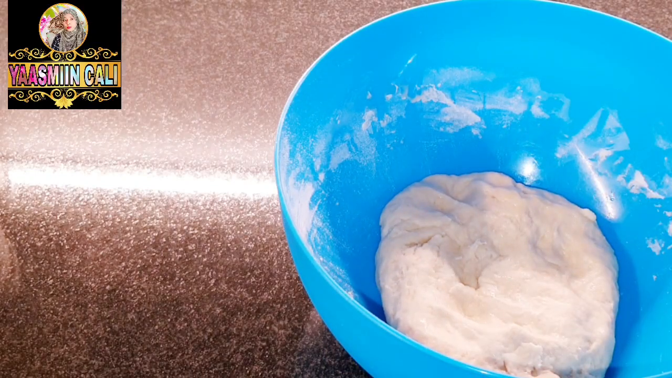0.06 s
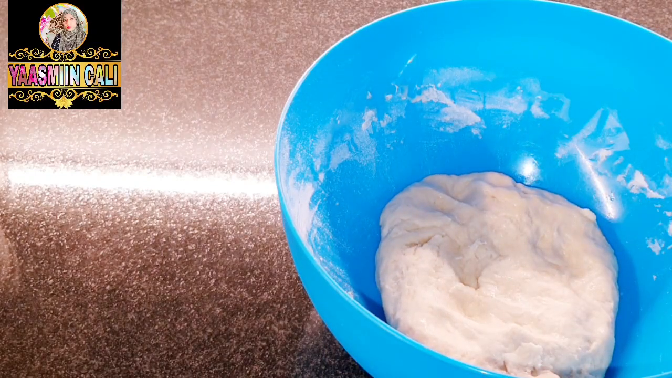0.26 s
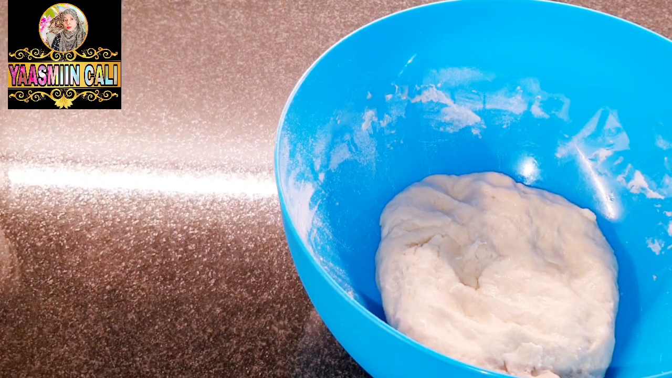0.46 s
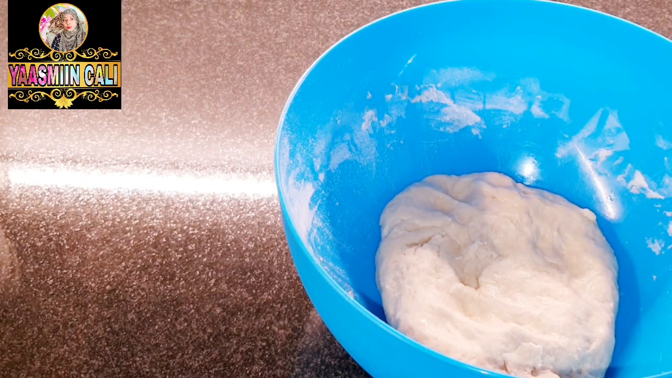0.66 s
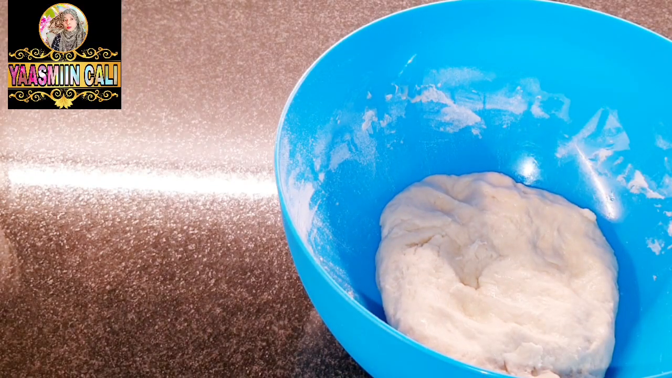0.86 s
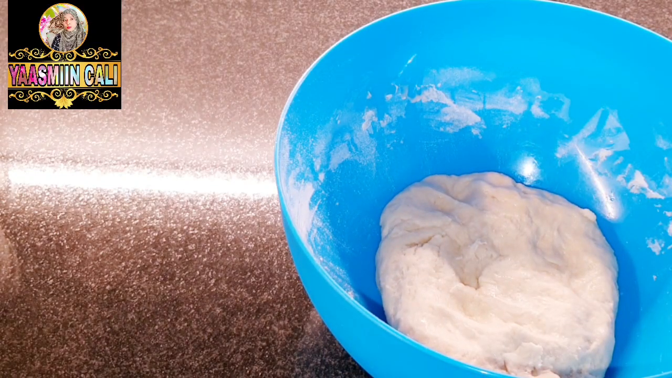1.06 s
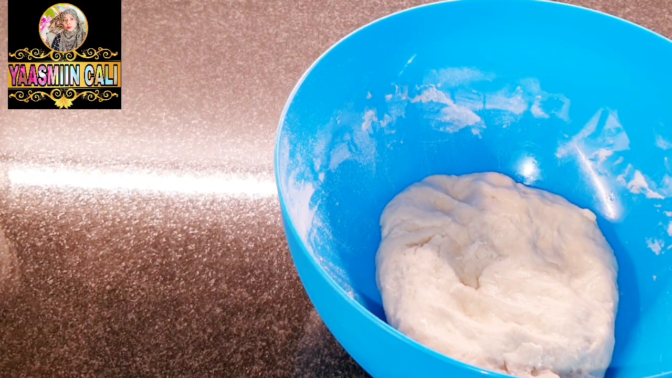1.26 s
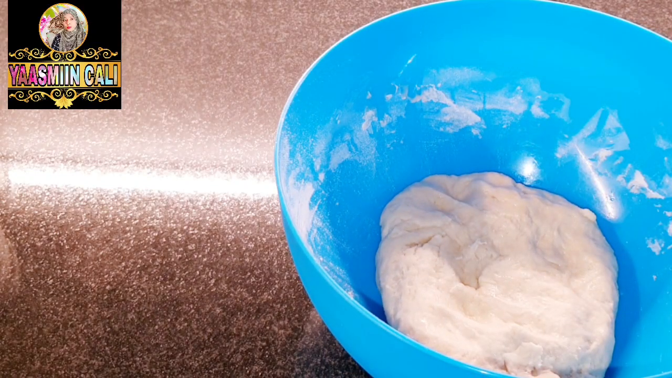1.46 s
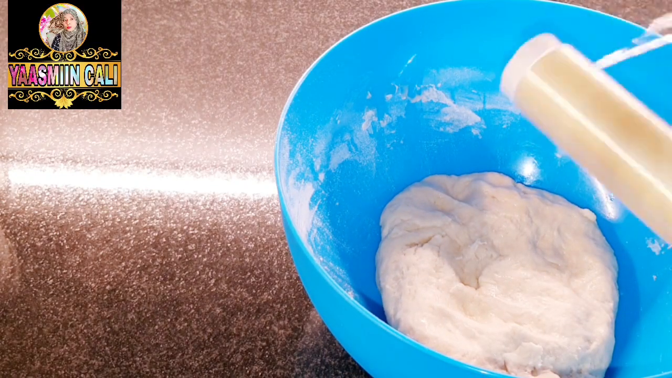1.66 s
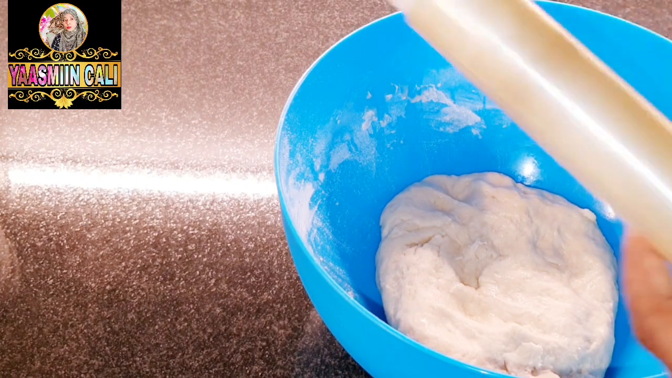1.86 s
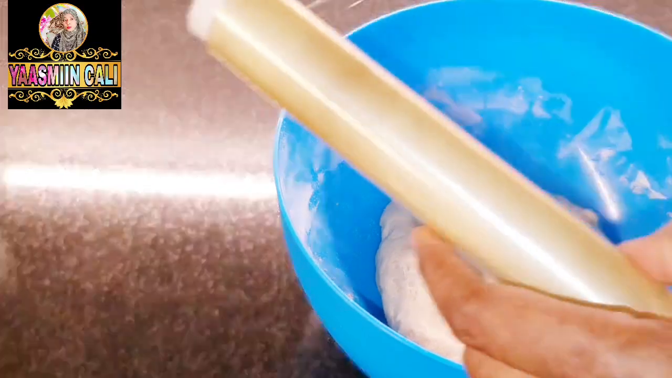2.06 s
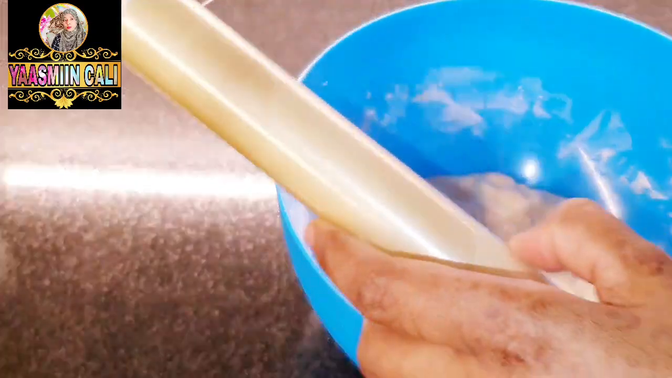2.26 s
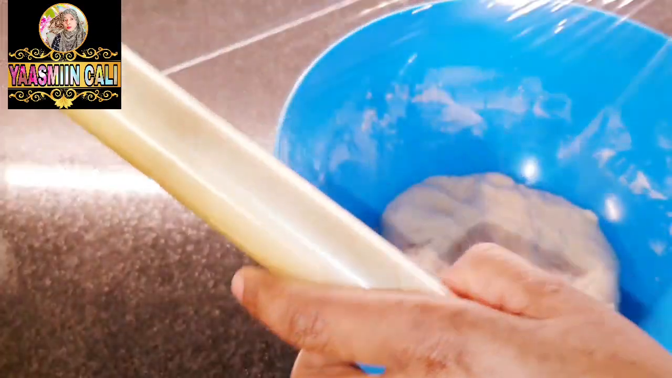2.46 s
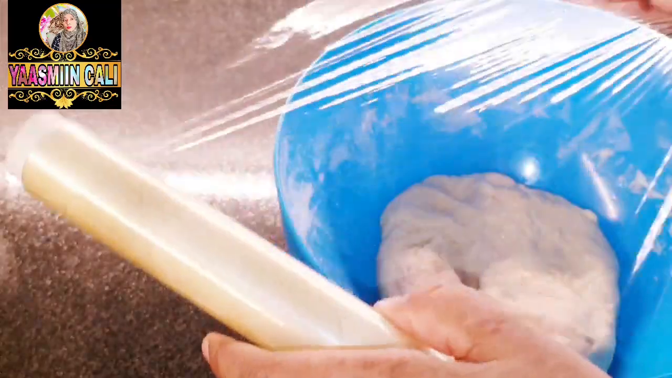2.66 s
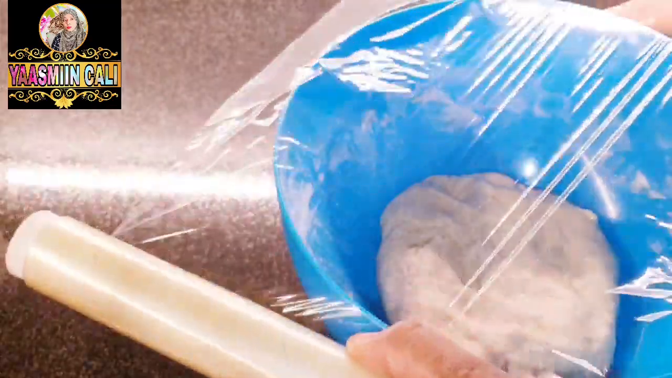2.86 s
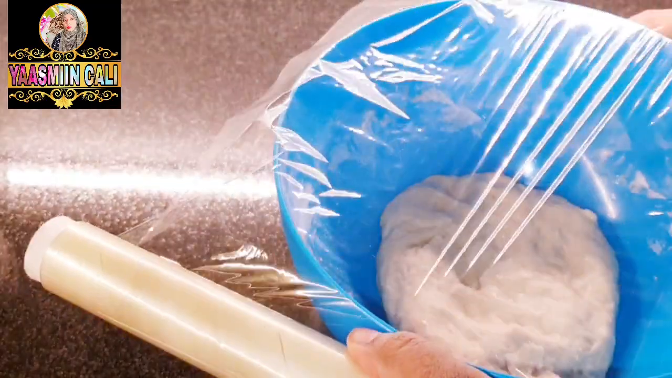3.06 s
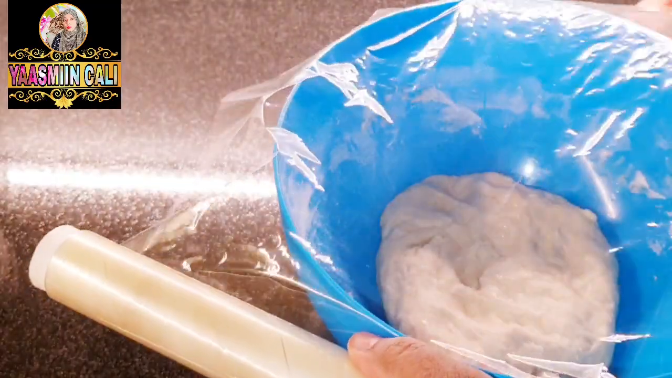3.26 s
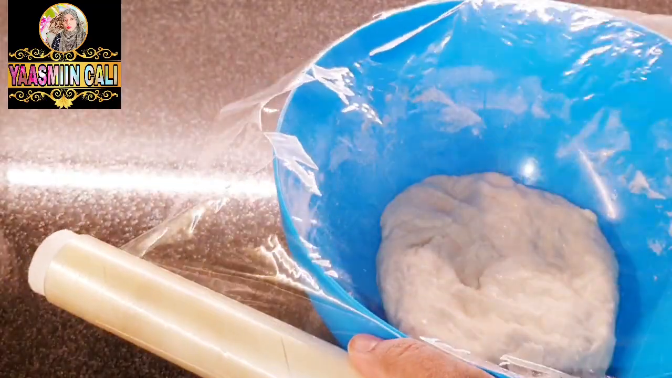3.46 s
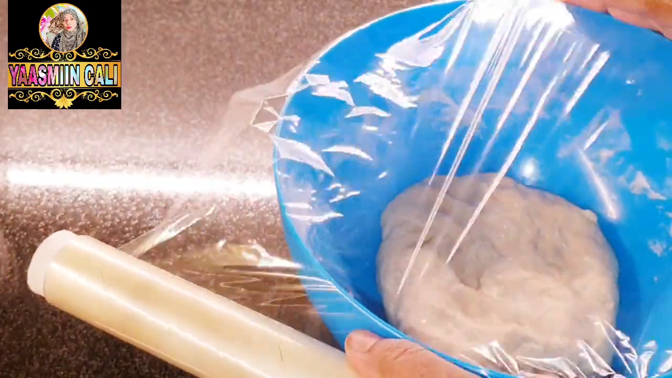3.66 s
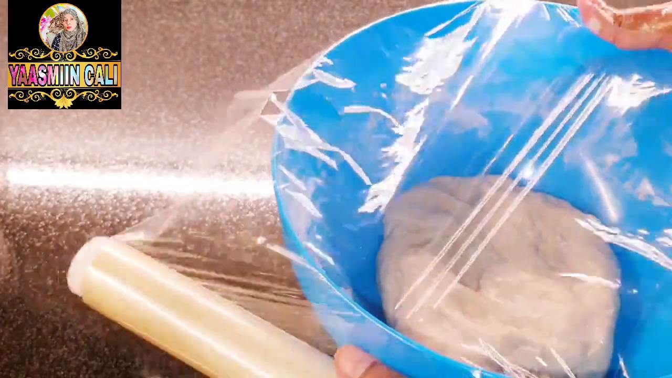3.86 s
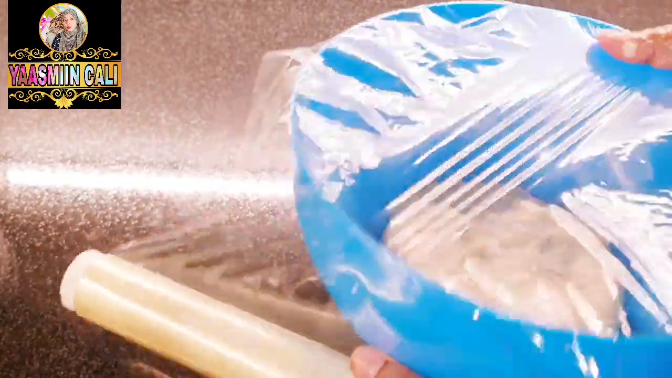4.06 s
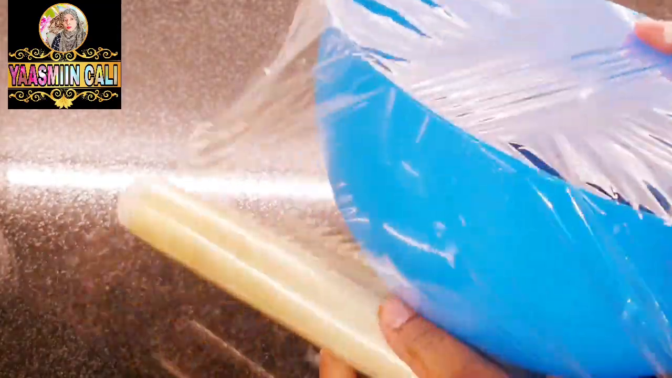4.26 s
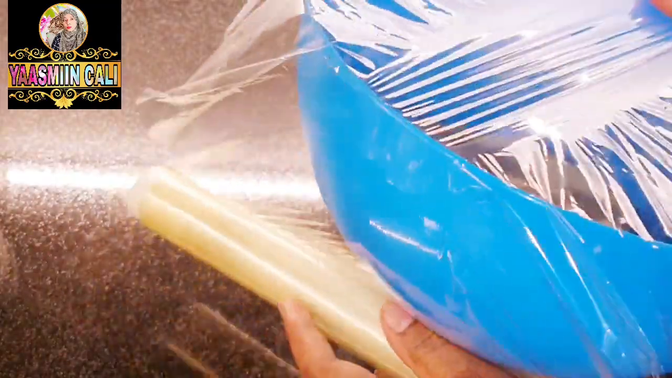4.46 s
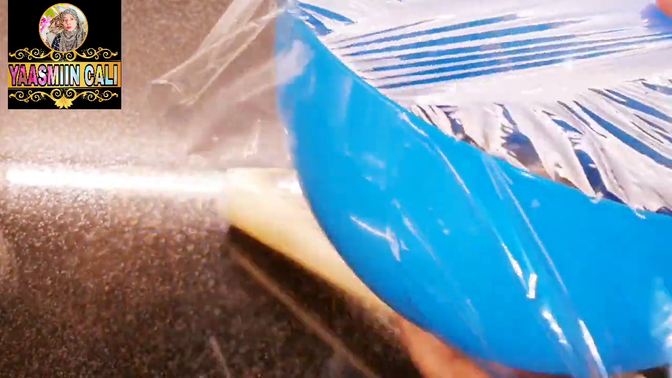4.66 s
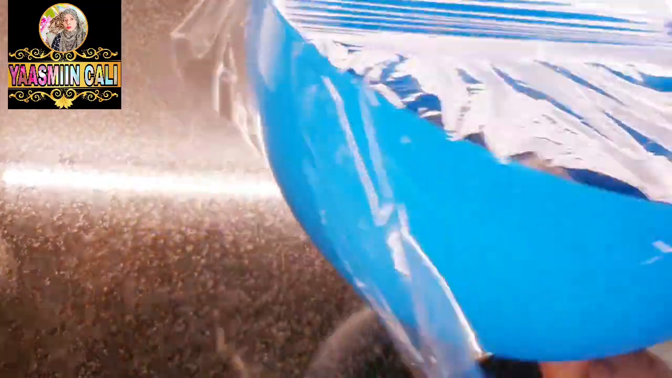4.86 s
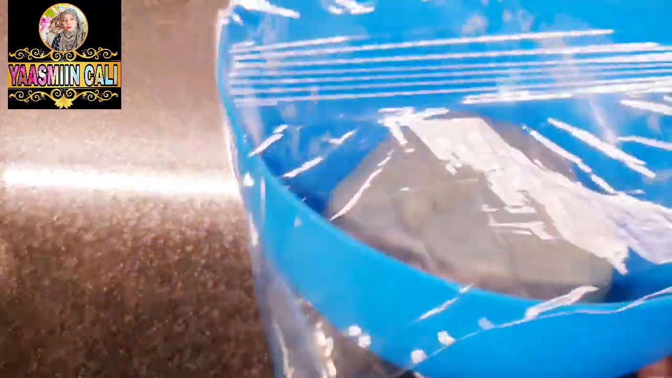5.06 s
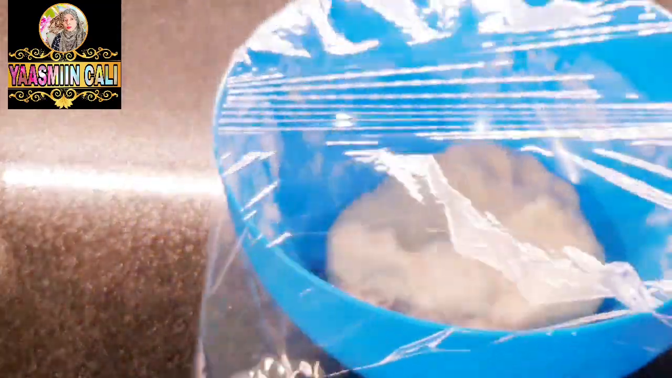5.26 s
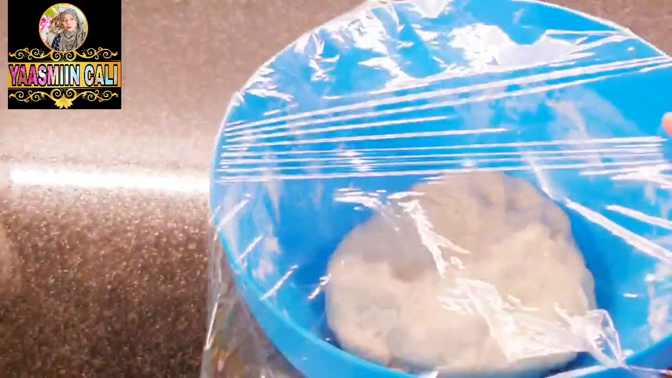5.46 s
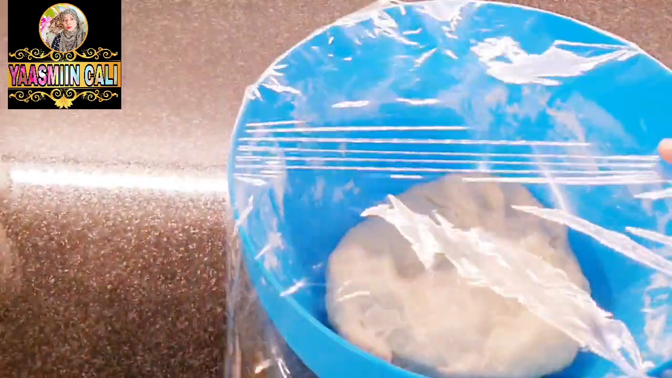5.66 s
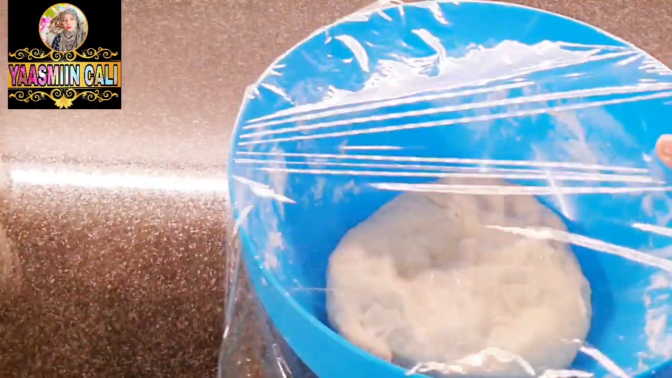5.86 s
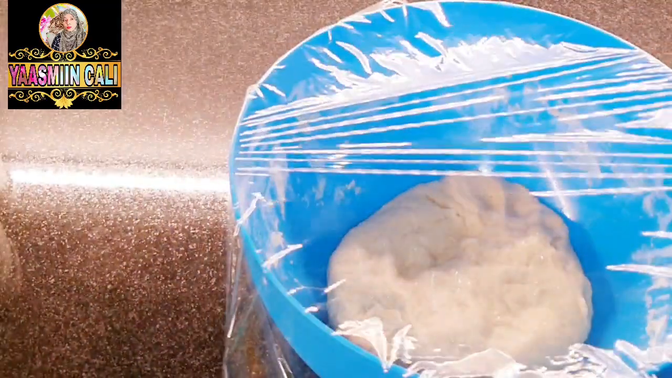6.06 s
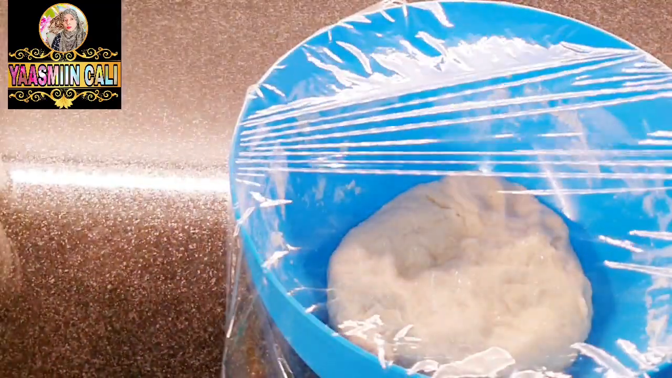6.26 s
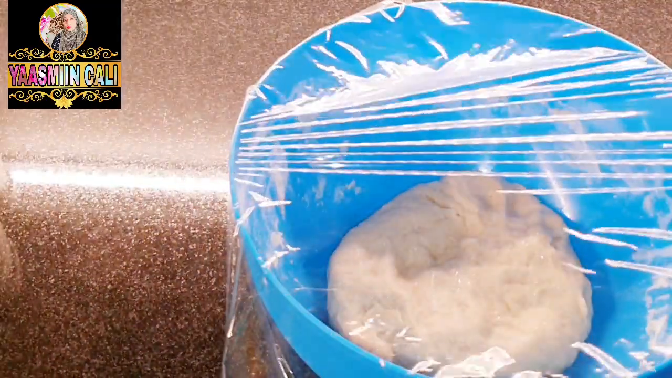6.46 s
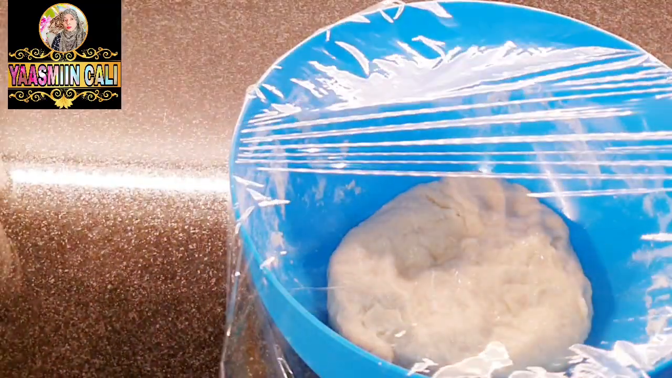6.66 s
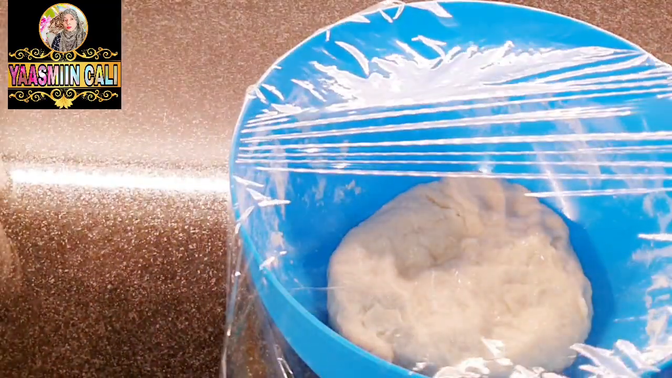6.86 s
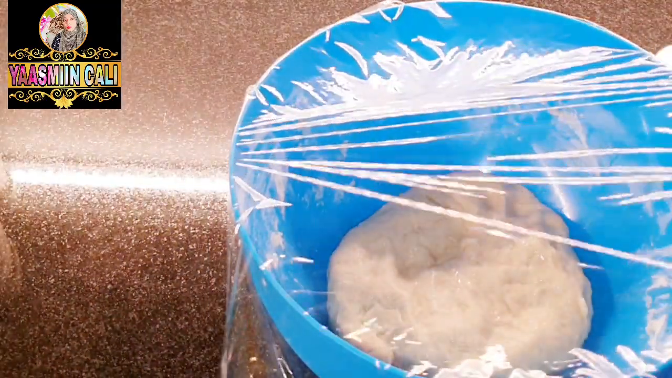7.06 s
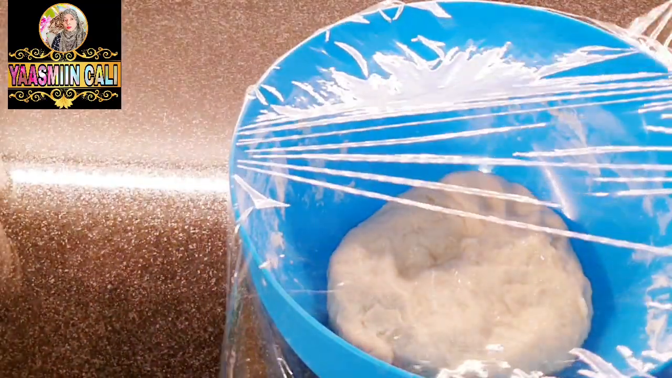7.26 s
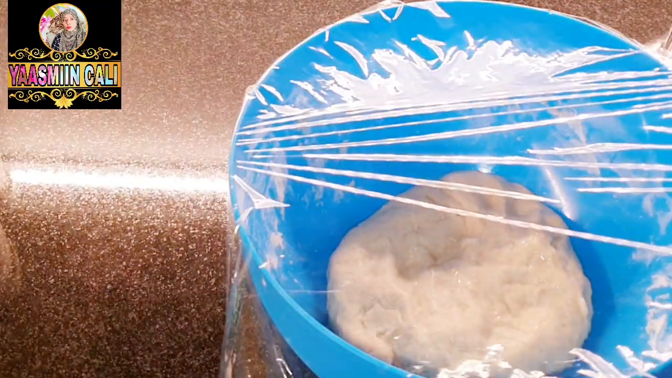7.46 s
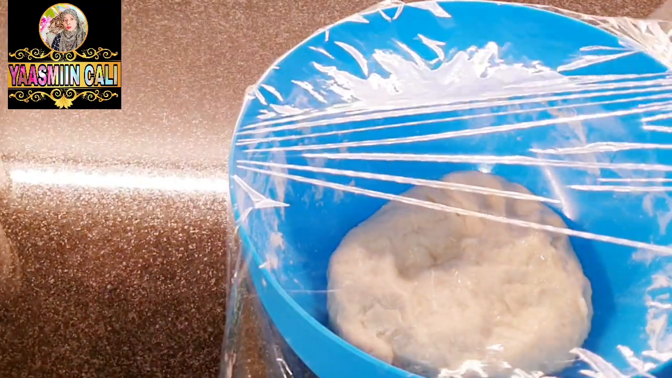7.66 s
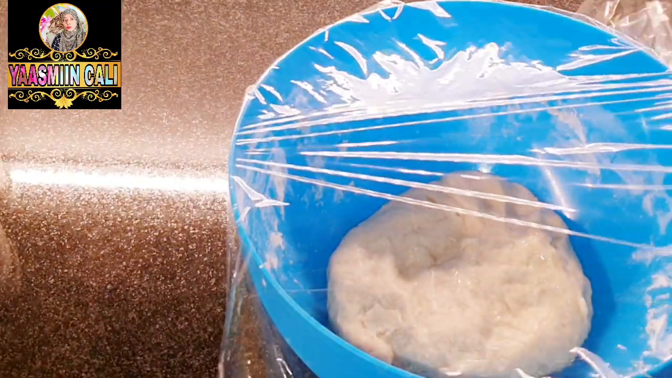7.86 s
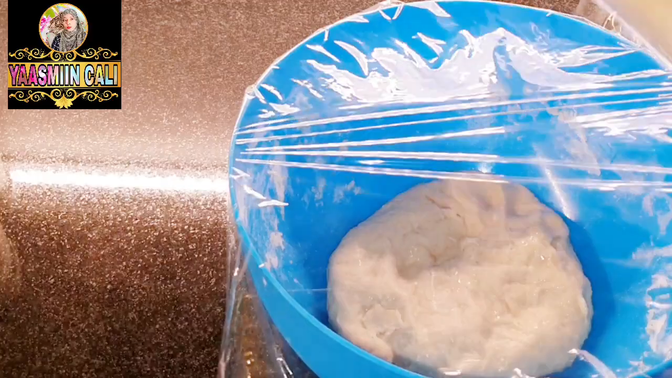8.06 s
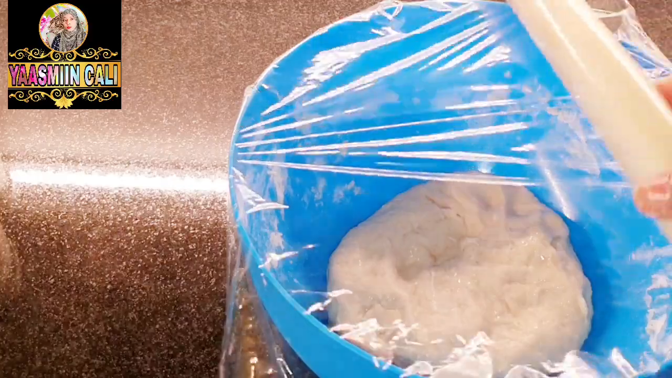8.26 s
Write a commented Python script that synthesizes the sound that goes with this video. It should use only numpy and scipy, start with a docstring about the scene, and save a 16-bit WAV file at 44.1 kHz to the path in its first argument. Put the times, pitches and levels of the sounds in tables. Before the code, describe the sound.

Cling film is unrolled with sharp crinkles and short squeaks, then pressed over a bowl that thuds and rings on a hard counter.

```python
"""A burst of rustling plastic film comes first, with hands rubbing a plastic bowl and a fridge humming behind.
The film is drawn off a roll and smoothed over the bowl on a stone counter, near a phone in a small kitchen.
Single creases snap, bowl and roll knock on the counter, and taut film squeaks over the rim.
Rustle and rubbing are showers of tiny clicks, snaps are short noise bursts, and squeaks are gliding noise bands.
Knocks add a dull punch, a noisy crack and the ringing of bowl and counter."""
import sys
import numpy as np
from scipy import signal
from scipy.fft import rfft, irfft, next_fast_len
from scipy.io import wavfile
from scipy.ndimage import uniform_filter1d

SR = 44100
rng = np.random.default_rng(int(sys.argv[2]) if len(sys.argv) > 2 else 0)


def bounce(signal):
    """Save signal as a 16-bit WAV file at the path given by the first command-line argument."""
    frames = np.transpose(np.atleast_2d(signal))
    limited = np.clip(frames, -1, 1)
    pcm = np.round(limited * 32767).astype(np.int16)
    wavfile.write(sys.argv[1], SR, pcm)


N = 366912  # length [samples]

# moves of the hands; swell and fade are times for a 20 dB change:
# (time at full strength [s], swell [s], hold [s], fade [s], film rustle [dB], rustle dullness [dB], wall rub [dB])
HAND_MOVES = [(0.0, .01, 0.014, 0.042, -52.5, -1, -55.5), (0.155, 0.014, 0.059, 0.096, -60, 0, -65.5),
              (.42, 0.18, 0, 0.051, -73, -1, -82), (0.576, 0.067, 0.18, 0.13, -67, -3, -71),
              (0.748, 0.13, 0.08, 0.24, -58, 0, -65.5), (.856, 0.064, 0.012, 0.21, -52.5, .5, -53.5),
              (1.014, 0.11, 0.093, 0.075, -65.5, 1, -66.5), (1.215, 0.18, 0.014, 0.14, -68, -5, -75),
              (1.395, 0.02, 0.14, 0.11, -67, -6, -88), (1.527, 0.11, 0.033, 0.13, -47, 0, -48.5),
              (1.624, 0.12, 0.13, 0.08, -54, 1, -55.5), (1.741, 0.03, 0.0098, 0.024, -43, -1.5, -46),
              (1.758, .03, 0, 0.075, -51, 0, -51.5), (1.936, 0.32, 0.049, 0.12, -49.5, 3, -57),
              (2.085, .005, 0.06, 0.11, -54.5, 1, -55.5), (2.21, 0.041, 0, 0.068, -56, -1.5, -60),
              (2.335, 0.38, 0.0062, 0.12, -62.5, 0.5, -62.5), (2.615, 0.63, 0.016, 0.3, -72, 7, -63.5),
              (2.791, 0.11, 0.0086, .15, -60, 2.5, -54), (3.048, 0.094, 0.12, 0.11, -73, .5, -68.5),
              (3.198, 0.03, 0.051, 0.099, -64.5, 0.5, -62.5), (3.503, 0.019, 0.15, .1, -68.5, 3.5, -86),
              (3.615, 0.011, 0.042, 0.26, -51.5, 2.5, -59), (3.779, 0.0037, 0.0014, 0.083, -42.5, 6, -61),
              (3.835, .05, 0.19, 0.3, -56, 0, -62.5), (4.228, 0.34, 0.042, 0.093, -47, 2, -55.5),
              (4.388, 0.017, 0.12, 0.13, -63.5, 2, -62), (4.683, 0.2, 0.14, 0.39, -49.5, 1, -55),
              (4.73, 0.088, 0.098, 0.17, -65, 3, -48.5), (5.18, .3, 0.021, 0.49, -57, 0, -63.5),
              (5.461, 0.019, 0.13, 0.12, -59, 4, -54), (5.657, .005, 0, 0.23, -53, 7, -66),
              (5.846, 0.39, 0.0085, 0.17, -57.5, -0.5, -63.5), (5.94, .05, 0.06, 0.54, -59.5, -0.5, -67.5),
              (6.19, 0.35, .01, .18, -60, 4, -64.5), (6.307, 0.15, 0.018, 0.18, -56.5, 0.5, -59),
              (6.406, 0.012, 0, 0.14, -52.5, 1, -57.5), (6.555, 0.077, 0.052, 0.088, -58.5, -1.5, -72),
              (6.65, .02, 0.042, .065, -69.5, -4, -85), (6.93, 0.0085, 0.072, 0.27, -60.5, 1, -64),
              (7.09, 0.084, 0.095, .05, -63, -0.5, -70), (7.207, .05, 0, 0.3, -55.5, 1.5, -64.5),
              (7.41, 0.023, 0, 0.21, -62, 4, -62), (7.492, 0.032, .005, .08, -54, 0, -65),
              (7.569, 0.044, 0.073, 0.14, -64.5, -2, -66), (7.828, 0.25, 0.13, 0.23, -60, -1, -63),
              (8.11, 0.092, 0.082, 0.041, -71.5, -3, -84), (8.208, .005, 0.0014, 0.043, -44, 3, -36),
              (8.228, .02, 0.009, .33, -53.5, 6.5, -69)]
# colour of the film rustle: (frequency [Hz], level per Hz [dB])
RUSTLE_COLOUR = [(410, -13.5), (700, -7), (1060, -7), (1230, -3.5), (1710, -4.5), (2240, -5.5),
                 (4320, -3.5), (7490, -7), (14800, -9.5), (16000, -33)]
# where the film lies: (time [s], left minus right [dB])
FILM_SIDE = [(0, -3.5), (.6, -3), (1.3, -3.5), (2.2, -1.5), (4, -0.9), (6, -1.5), (8.3, -1.5)]
# colour of the rubbed bowl wall: (frequency [Hz], level per Hz [dB])
WALL_COLOUR = [(88, -35), (150, -6.5), (229, -2.5), (389, -6.5), (581, -3), (963, -5), (1060, -11),
               (1220, -13.5), (2500, -13.5), (3250, -14), (5500, -120)]
# how much sooner the hands reach the right microphone: (time [s], lead [samples])
RIGHT_LEAD = [(0, 9), (2.2, 11), (2.7, -5.5), (5.8, 5.5), (6.2, -9), (8.3, 1)]
# colour of the counter under a shifting hand: (frequency [Hz], level per Hz [dB])
PUSH_COLOUR = [(30, -3), (55, 7.5), (85, -1), (130, -7.5), (200, -73), (400, -86)]
# a hand shoves the counter: (time [s], level [dB])
SHOVES = [(.42, -70), (.92, -59), (1.58, -43), (1.76, -47), (1.91, -50), (2.58, -55), (2.8, -48),
          (2.92, -46), (3.23, -56), (3.654, -52), (3.8, -42), (4.0, -49), (4.75, -46), (5.18, -55.5),
          (6.11, -55), (6.56, -60), (7.82, -53)]
# colour of the quiet kitchen: (frequency [Hz], level per Hz [dB])
AIR_COLOUR = [(18, -45), (30, -6), (104, -6), (149, -41), (188, -14), (226, -16.5), (324, -22), (378, -27),
              (587, -17.5), (865, -20), (1040, -19), (1450, -20.5), (2430, -32), (6500, -36), (14500, -42)]
# how alike left and right are in the kitchen noise: (frequency [Hz], likeness [-1 to 1])
AIR_LIKENESS = [(60, 0.56), (240, 0.39), (950, 0.14), (3770, 0), (15000, 0.15)]
# fridge hum: (frequency [Hz], width of each resonance pass [Hz], level [dB])
FRIDGE_HUM = [(100.2, 16, -69), (201.2, 9.2, -78.5), (313, 28, -79.5), (1400, 13, -89)]
# how fast the room sound dies: (frequency [Hz], time to fall 60 dB [s])
KITCHEN_FADE = [(100, 0.31), (500, 0.28), (2000, 0.33), (6000, 0.093), (14000, 0.2)]
# single creases snapping:
# (time [s], tick peak [dB], brightness [Hz], left minus right [dB], rattle's time to fall 60 dB [s])
SNAPS = [(0.155, -42, 4900, -9, 0.1), (0.743, -35, 2940, -2, 0.072), (1.049, -44, 11000, -8.5, .06),
         (1.1015, -44, 5970, -11.5, 0.079), (1.3888, -46, 10300, -5, 0.082), (1.528, -37, 2560, 1, 0.11),
         (1.742, -37, 8910, -2, 0.074), (2.082, -27.5, 3540, -8.5, 0.1), (2.1044, -32, 4770, -7, 0.088),
         (2.121, -27.5, 2900, 4.5, 0.052), (2.1944, -53, 3470, -6, 0.1), (2.2063, -39, 3000, 4.5, 0.088),
         (3.1923, -46, 4710, -1, 0.1), (3.6147, -57, 3630, -1, 0.1), (4.1943, -40, 2920, 3, 0.08),
         (4.238, -27, 5200, 1, 0.075), (4.3832, -43, 5820, 8, 0.091), (4.7696, -38, 3150, 6, 0.1),
         (5.4435, -47, 2590, 7.5, 0.071), (5.9314, -51, 3800, 3.5, 0.1), (6.1774, -38, 10580, 5.5, 0.13),
         (6.264, -40, 4680, -2, 0.091), (6.4085, -31.5, 3400, 2.5, 0.11), (6.5507, -38, 5690, 3, 0.1),
         (6.6687, -45, 6550, 4, 0.11), (6.9326, -50, 6200, 6, 0.086), (7.002, -39, 4660, 2, 0.074),
         (7.0673, -45, 2570, 6, 0.12), (7.2, -37.5, 4260, -2, 0.1), (7.349, -48, 5410, 6, 0.1),
         (7.4145, -51, 3430, -12, 0.1), (7.484, -47, 8310, -4, 0.11)]
# knocks; the ring factor is short where a hand damps the bowl:
# (time [s], strength [dB], favoured pitch [Hz], fall below it [dB per octave], fall above it [dB per octave],
#  counter thump [dB], hard-edge click [dB], click pitch [Hz], left minus right [dB], ring length [factor])
KNOCKS = [(0.839, -49, 493, 9.9, 17, -61, -63, 5000, -7, 1.4),
          (0.885, -38.5, 287, 9, 18, -67, -39, 3550, -2.5, 0.25),
          (2.079, -51.5, 297, 3, 2.2, -50, -42, 3940, -1, 1.3),
          (2.494, -54.5, 512, 3.9, 3, -69, -47, 1900, -3.5, 0.97),
          (2.773, -50, 290, 1.1, 6.8, -47.5, -47, 1130, -2, 1.1),
          (3.219, -58, 300, 3, 3, -61, -51.5, 1200, 2, 1.3),
          (3.612, -46, 292, 2, 3.7, -51, -43, 3480, -2, 0.8),
          (3.778, -25, 1030, 8.5, 4.3, -49, -27, 3530, 4.5, .6),
          (3.894, -37, 285, 7.4, 2.2, -43.5, -41, 3700, 1.5, 0.43),
          (4.237, -25.5, 282, 5, 5.5, -38.5, -25.5, 2340, -0.5, 0.74),
          (4.441, -49.5, 540, 9.8, 12, -72, -58, 1500, -5, 0.99),
          (4.645, -47, 760, 24, 20, -73, -56, 4500, 3, 2),
          (4.716, -39, 280, 3, 11, -42, -46, 2400, -2.5, 1.06),
          (4.776, -45, 290, 3, 10, -47, -41, 2800, 2, 0.95),
          (4.827, -26, 540, 15.5, 46, -50, -37.5, 2240, -1.5, 0.81),
          (5.464, -22.5, 626, 1.6, 15.7, -25.5, -24, 1990, -1.5, 0.95),
          (5.659, -26.5, 560, 1.5, 4.4, -28.5, -25, 2210, 0.9, 0.95),
          (6.407, -49.5, 300, 2.8, 13, -62, -42.5, 3420, -1.5, .55),
          (6.945, -54.5, 402, 3, 10, -64, -58, 2100, -2, 1.1),
          (8.206, -14, 983, 6.5, 11.6, -35, -36, 2300, -1, 0.92)]
# ringing modes of bowl and counter: (frequency [Hz], relative level [dB], time to fall 60 dB [s])
BOWL_MODES = [(82.7, -10.5, 0.67), (192.7, -11, 0.2), (265, -8, 0.23), (345, -2.5, 0.22), (399, -5.5, 0.18),
              (494.7, -4.5, 0.31), (556, 3, 0.12), (648, -8.5, 0.22), (701, -10.5, 0.24), (771, -7, 0.21),
              (816, -28, 0.51), (924, -8.5, 0.14), (931, -10, 0.06), (1132, -7.5, 0.2), (1219, 0, 0.061),
              (1256, -19, 0.23), (1693, 0.5, 0.085), (1856, -12, 0.096), (2240, -38, 0.12),
              (2390, -17, 0.25), (2880, -4, 0.074), (3373, -5.5, 0.11), (4150, -6, 0.096),
              (4500, -15, 0.13)]
# first dull ring of a blow: (frequency [Hz], time to fall 60 dB [s])
PUNCH_RINGS = [(272, 0.041), (83, 0.077), (554, 0.054), (763, 0.049), (1062, 0.034), (2090, 0.033),
               (3930, 0.036), (7740, 0.0054)]
# taut film dragged over the rim: (start [s], length [s], level [dB], first pitch [Hz], last pitch [Hz])
SQUEAKS = [(2.471, 0.051, -59.5, 1950, 1960), (2.511, 0.17, -60.5, 2030, 2180),
           (3.035, 0.095, -73.5, 2750, 2760), (3.74, 0.14, -54, 2240, 2170),
           (3.887, 0.13, -55.5, 2270, 2170), (3.981, 0.17, -59, 2230, 2120),
           (4.172, 0.055, -52.5, 2150, 2380), (4.392, .12, -59.5, 1620, 2060)]

STILL_FILM_DB, RESTING_HAND_DB = -112, -76  # levels between moves
WALL_HZ, WALL_ROAM, ROAM_S = 361, 0.19, 0.051  # the band where the wall speaks most roams by chance
PUSH_DB, PUSH_WAVER_DB = -64, 3  # weight resting on the counter
PUSH_FADE_S = 0.045  # time for a shove to change 20 dB
AIR_DB = -65.5
THUMP_HZ, THUMP_FALL_DB, CLICK_FALL_DB = 86, 32, 17.5  # falls in dB per octave
EDGE_HZ = 15700  # top of the phone's band


def gain_of(db):
    """Turns decibels into a plain multiplier."""
    return 10 ** (np.asarray(db) / 20)


def evened(x):
    """Scales a signal to an rms of 1."""
    return x / np.sqrt(np.mean(x ** 2) + 1e-20)


def read(points, hz):
    """Reads a curve at the given pitches, with pitch on a log scale."""
    f, value = np.transpose(points)
    return np.interp(np.log(hz + 1), np.log(f + 1), value)


def columns(rows, t):
    """Reads every column of a curve at the times t."""
    s, *values = np.transpose(rows)
    return [np.interp(t, s, v) for v in values]


def add(mix, s, sound):
    """Adds a stereo sound to the mix from s seconds on."""
    part = mix[:, round(s * SR):][:, :sound.shape[1]]
    part += sound[:, :part.shape[1]]


def coloured(x, points):
    """Filters x by a colour curve, then sets its rms to 1."""
    size = next_fast_len(len(x))
    filter_gain = gain_of(read(points, np.fft.rfftfreq(size, 1 / SR)))
    return evened(irfft(rfft(x, size) * filter_gain, size)[:len(x)])


def resonate(x, hz, width):
    """Shifts the pitch hz down to zero, smooths, and shifts back: a resonance that can glide."""
    turn = np.exp(2j * np.pi * np.cumsum(hz * np.ones(len(x))) / SR)
    r = np.exp(-np.pi * width / SR)
    return 2 * (turn * signal.lfilter([1 - r], [1, -r], x / turn)).real


def grains(per_s, spread_db):
    """Sparse clicks of random sign, a few of them large."""
    size = gain_of(spread_db * np.minimum(rng.exponential(1, N), 5))
    return size * rng.choice([-1., 1.], N) * (rng.random(N) < per_s / SR)


def placed(x, pan_db, samples_per_db=5.5):
    """The nearer microphone hears a sound louder and sooner."""
    n, half = np.arange(len(x)), np.asarray(pan_db) / 2
    return np.array([gain_of(side * half) * np.interp(n + side * half * samples_per_db, n, x)
                     for side in (1, -1)])


def wander(seconds):
    """Slow random drift, made by smoothing noise twice; rms 1."""
    span = round(seconds * SR)
    return evened(uniform_filter1d(uniform_filter1d(rng.standard_normal(N), span), span))


def moves():
    """Adds up the power of all hand moves; louder rustles count more towards the dullness."""
    t = np.arange(0, N / SR, .002)
    s, swell, hold, fade, film_db, dull_db, rub_db = np.transpose(HAND_MOVES)[:, :, None]
    before = np.maximum(s - t, 0) / np.maximum(swell, .002)
    after = np.maximum(t - s - abs(hold), 0) / np.maximum(fade, .01)
    shape_db = -20 * (before + after)
    film = gain_of(film_db + shape_db) ** 2
    rub = gain_of(rub_db + shape_db) ** 2
    film_total = film.sum(0) + gain_of(STILL_FILM_DB) ** 2
    rub_total = rub.sum(0) + gain_of(RESTING_HAND_DB) ** 2
    curves = 10 * np.log10(film_total), (film * dull_db).sum(0) / film_total, 10 * np.log10(rub_total)
    return [np.interp(np.arange(N) / SR, t, c) for c in curves]


def rustle(level_db, dull_db):
    """Thousands of tiny creases all over the sheet: each microphone hears mostly its own mixture."""
    pan_db = columns(FILM_SIDE, np.arange(N) / SR)[0]
    clumps = gain_of(0.76 * evened(uniform_filter1d(rng.standard_normal(N), 400)))  # creases come in clusters
    shared, left, right = (coloured(clumps * grains(9000, 2.8), RUSTLE_COLOUR) for _ in range(3))
    sheet = 0.23 * shared + 1.183 * np.array([left, right])
    # folds of other sizes come and go
    z = signal.stft(sheet, nperseg=256, noverlap=128)[2]
    folds = evened(uniform_filter1d(uniform_filter1d(rng.standard_normal(z.shape[1:]), 16, 0), 10, 1))
    sheet = signal.istft(z * gain_of(1.7 * folds), nperseg=256, noverlap=128)[1][:, :N]
    # broad slack folds sound lower than fine tight ones
    lows = signal.filtfilt(*signal.butter(1, 4500, fs=SR), sheet)
    tilted = gain_of(dull_db) * lows + (sheet - lows) / gain_of(dull_db)
    return gain_of(level_db + np.outer([.5, -.5], pan_db)) * tilted


def handling(rub_db):
    """Slips of skin shake the bowl wall, most near one moving band, and shoves shake the counter."""
    t = np.arange(N) / SR
    shoves = sum(gain_of(db - 20 * abs(t - s) / PUSH_FADE_S) for s, db in SHOVES)
    push = shoves + gain_of(PUSH_DB + PUSH_WAVER_DB * wander(0.069))
    hz = WALL_HZ * np.exp(WALL_ROAM * wander(ROAM_S))
    slips = coloured(grains(900, 2.24), WALL_COLOUR)
    rub = gain_of(rub_db) * (0.48 * slips + 0.48 * evened(resonate(slips, hz, 240)))
    mix = rub + push * coloured(rng.standard_normal(N), PUSH_COLOUR)
    left = np.interp(t - columns(RIGHT_LEAD, t)[0] / SR, t, mix)
    return np.array([left, mix])


def air():
    """Steady kitchen noise with slight patches, and the wavering hum of the fridge from narrowed noise."""
    frames, hz = N // 512 + 5, np.fft.rfftfreq(2048, 1 / SR)
    a, b, c, d, patches = rng.standard_normal((frames, 1025, 5)).T
    patches = evened(uniform_filter1d(uniform_filter1d(patches, 12, 0), 8, 1))
    same = np.clip(read(AIR_LIKENESS, hz), -1, 1)[:, None]
    left = a + 1j * b
    right = same * left + np.sqrt(1 - same ** 2) * (c + 1j * d)
    z = np.array([left, right]) * gain_of(read(AIR_COLOUR, hz)[:, None] + 2.6 * patches)
    noise = rng.standard_normal(N)
    hum = sum(gain_of(db) * evened(resonate(resonate(noise, f, w), f, w)) for f, w, db in FRIDGE_HUM)
    return gain_of(AIR_DB) * evened(signal.istft(z, nperseg=2048, noverlap=1536)[1][:, :N]) + hum


def kitchen(x):
    """Room echoes are sparse taps of random sign, each band dying at its own speed."""
    taps = np.zeros((2, 26000))
    at = np.arange(160, 25980, 20) + rng.integers(0, 20, (2, 1291))
    np.put_along_axis(taps, at, rng.choice([-1., 1.], at.shape), 1)
    hz, t, z = signal.stft(taps, SR, nperseg=256)
    tail = signal.istft(z * gain_of(-60 * t / read(KITCHEN_FADE, hz)[:, None]), SR, nperseg=256)[1]
    lows = signal.sosfilt(signal.butter(2, 500, fs=SR, output="sos"), tail[0] - tail[1])
    tail[1] += lows  # long waves reach both microphones alike
    return signal.fftconvolve(x.mean(0)[None], tail / np.linalg.norm(tail[0]), axes=1)[:, :N]


def snaps():
    """A crease flips: a sharp broad tick, then its neighbours rattle out."""
    out, t = np.zeros((2, N)), np.arange(6000) / SR
    for s, db, hz, pan_db, t60 in SNAPS:
        noise = rng.standard_normal((2, 6000))
        tick = np.r_[np.zeros(40), resonate(noise[0], hz, 7000) * gain_of(-60 * t / .008)]
        tick = signal.lfilter(*signal.butter(1, 2200, "high", fs=SR), tick)  # a thin sheet radiates no bass
        tick = gain_of(db) * tick / abs(tick).max()
        add(out, s - 40 / SR, placed(tick, pan_db, samples_per_db=2.5))
        bright_noise = noise - .5 * np.roll(noise, 1, axis=1)
        add(out, s, gain_of(db - 17 - 60 * t / max(t60, .01)) * bright_noise)
    return out


def blow_spectrum(hz, db, pitch_hz, below_db, above_db, thump_db, click_db, click_hz):
    """A blow is a broad hump at its own pitch, a thump of the counter and the click of a hard edge."""
    octaves = np.log2(hz / pitch_hz)
    hump = db - np.where(octaves > 0, abs(above_db), -abs(below_db)) * octaves
    thump = thump_db - THUMP_FALL_DB * abs(np.log2(hz / THUMP_HZ))
    click = click_db - CLICK_FALL_DB * abs(np.log2(hz / click_hz))
    soft_db = -12 * np.maximum(np.log2(hz / 3800), 0)  # contact time dulls the top
    return np.where(hz < 2 * THUMP_HZ, thump, np.maximum(hump, click) + soft_db)


def knocks():
    """Each blow is a dull punch and a noisy crack, and rings the same modes, weighted by where it lands."""
    out, t = np.zeros((2, N)), np.arange(12000) / SR
    hz, mode_db, t60 = np.transpose(BOWL_MODES)[:, :, None]
    punch_hz, punch_t60 = np.transpose(PUNCH_RINGS)[:, :, None]
    wide = np.fft.rfftfreq(len(t), 1 / SR)
    alternate = (-1.) ** np.c_[:len(BOWL_MODES)]  # neighbouring modes swing opposite
    # phase in radians: each mode radiates from other parts of the wall
    skew = alternate * 0.6 * np.minimum(hz / 600, 1)
    for s, *contact_rule, pan_db, length in KNOCKS:
        blow_db = blow_spectrum(punch_hz[:, 0], *contact_rule)
        blow = [(35, blow_db[1] + 6)] + sorted(zip(punch_hz[:, 0], blow_db))
        # the wall radiates little between its two groups of modes
        blow = sorted(blow + [(1470, read(blow, 1600) - 7)])

        # all punch rings crest together at full contact
        punch_wave = np.cos(2 * np.pi * punch_hz * (t - .0016))
        punch = gain_of(np.c_[blow_db] - 60 * t / punch_t60) * punch_wave

        spot = gain_of(2.0 * rng.standard_normal(hz.shape))  # another spot each time
        size = spot * alternate * gain_of(read(blow, hz) + mode_db - 60 * t / (t60 * length))
        size *= 1 - np.exp(-t * hz / 2.86)  # low modes build up later
        rings = np.array([(size * np.sin(2 * np.pi * hz * t + side * skew)).sum(0) for side in (1, -1)])

        noise_colour = gain_of(read(blow, wide)) / np.sqrt(wide + 50)
        noise = irfft(rfft(rng.standard_normal(len(t))) * noise_colour, len(t))
        crack = noise * (gain_of(41.5 - 60 * t / 0.025) + gain_of(36.5 - 60 * t / (0.27 * length)))
        contact = np.minimum(t / 0.0013, 1) ** 2 * (gain_of(-0.5) * punch.sum(0) + crack)
        ring_gain = gain_of([[pan_db / 2], [-pan_db / 2]])
        add(out, s, placed(contact, pan_db, samples_per_db=2.0) + rings * ring_gain)
    return out


def squeaks():
    """Fast uneven slips ring a narrow gliding band of the taut film in a wider one, with another a little lower."""
    out = np.zeros((2, N))
    for s, length, db, first_hz, last_hz in SQUEAKS:
        hz = np.linspace(first_hz, last_hz, round(length * SR))
        slips = rng.standard_normal(len(hz))
        slips = slips * abs(slips)
        wobble = 1 + .02 * np.sin(rng.random() * 6 + np.arange(len(hz)) * 60 / SR)
        narrow = resonate(slips, hz * wobble, 130)
        wider = resonate(resonate(slips, hz, 560), hz, 560)
        lower = resonate(resonate(slips, 0.83 * hz, 250), 0.95 * hz, 250)
        bands = 1.3 * narrow + 0.52 * wider + 0.65 * lower
        add(out, s, placed(gain_of(db) * evened(bands) * signal.windows.tukey(len(hz), .6), 0))
    return out


def scene():
    """Adds the close sources, their room sound and the background."""
    film_db, dull_db, rub_db = moves()
    film = rustle(film_db, dull_db) + handling(rub_db) + snaps() + squeaks()
    blows = knocks()
    room = kitchen(gain_of(-8.5) * film + gain_of(-10.0) * blows)
    return film + blows + room + air()


def record(dry):
    """The phone drops the deepest bass and has a band limit."""
    thin = signal.sosfilt(signal.butter(3, 52, "high", fs=SR, output="sos"), dry)
    band_limit = signal.firwin(511, EDGE_HZ, window=("kaiser", 9), fs=SR)
    return signal.oaconvolve(thin, band_limit[None], "same")


dry = scene()
out = record(dry)
bounce(out)
```